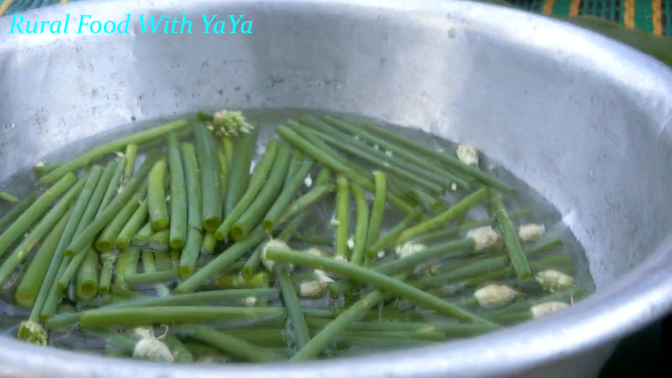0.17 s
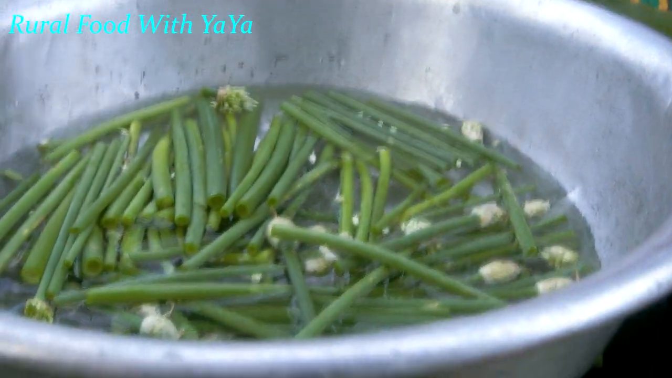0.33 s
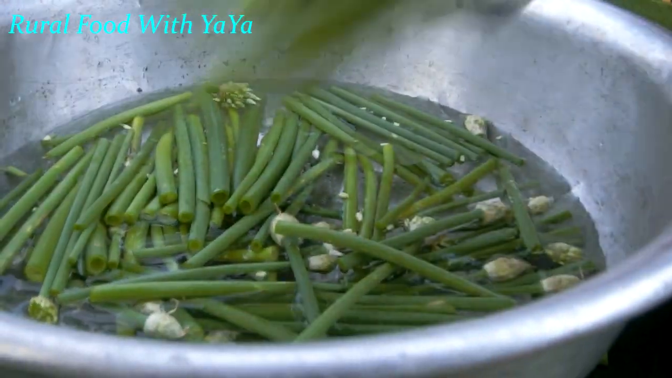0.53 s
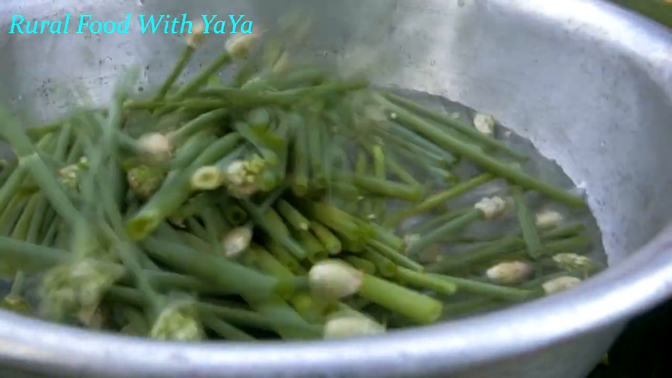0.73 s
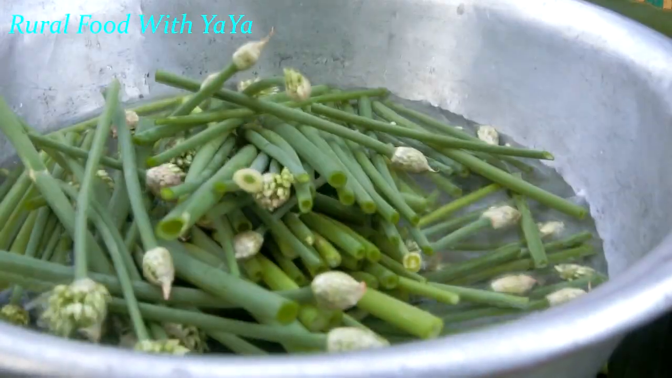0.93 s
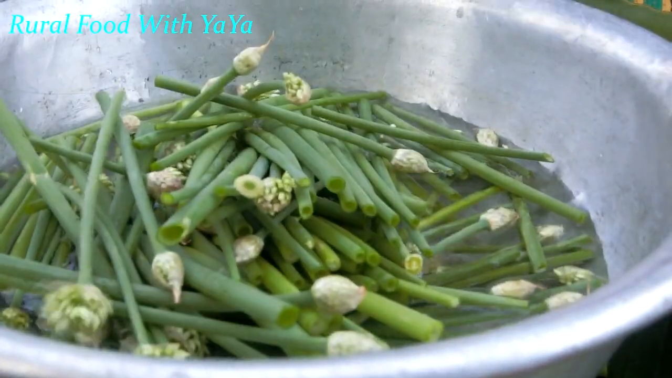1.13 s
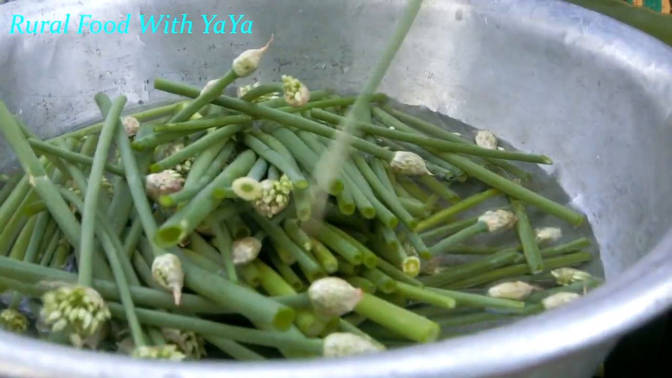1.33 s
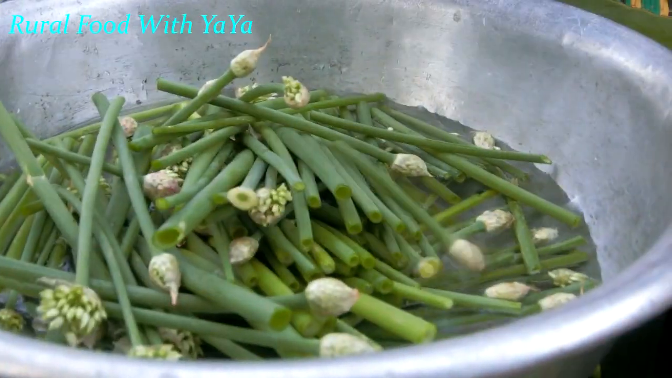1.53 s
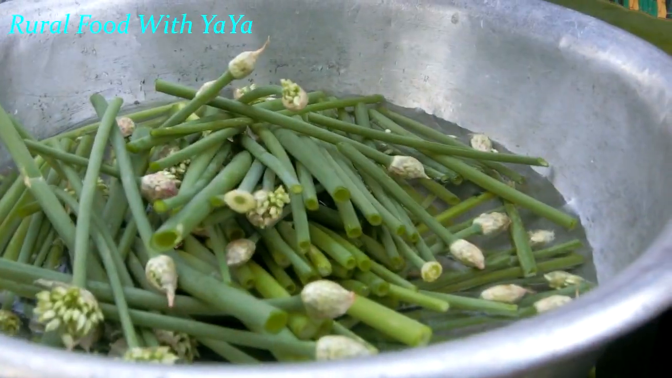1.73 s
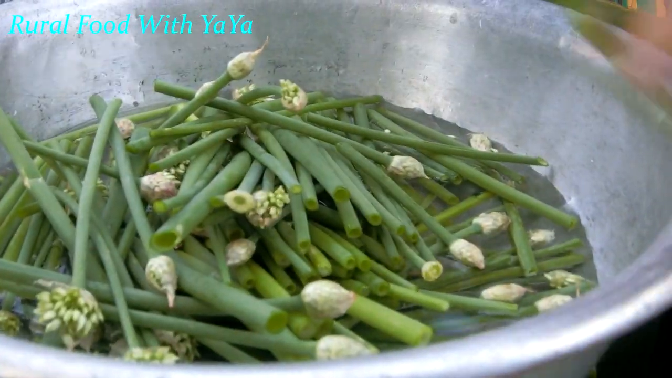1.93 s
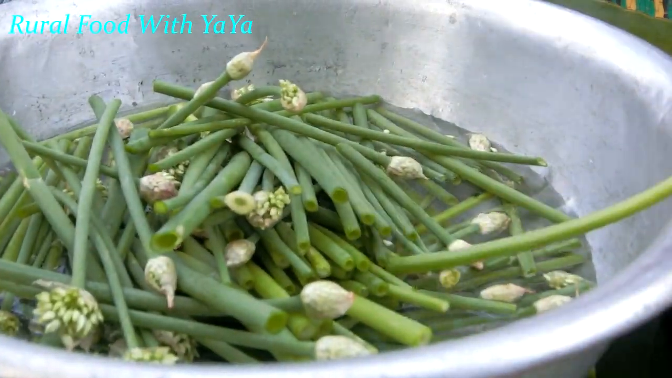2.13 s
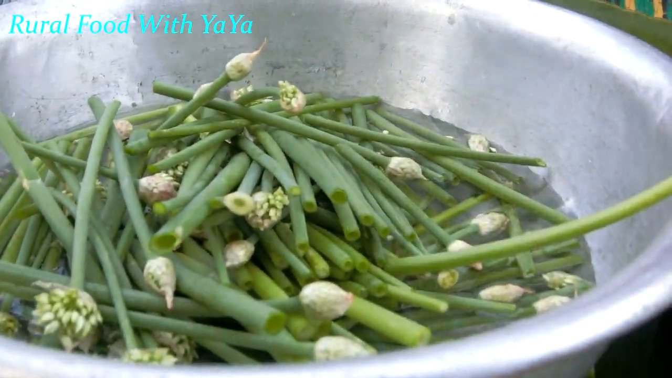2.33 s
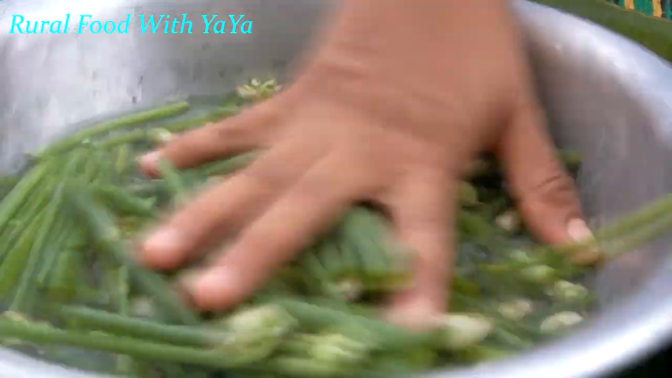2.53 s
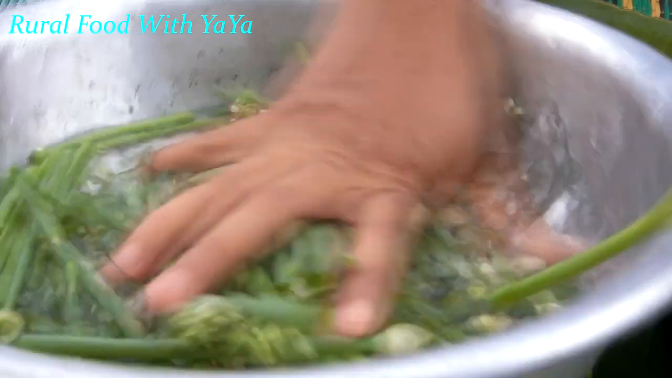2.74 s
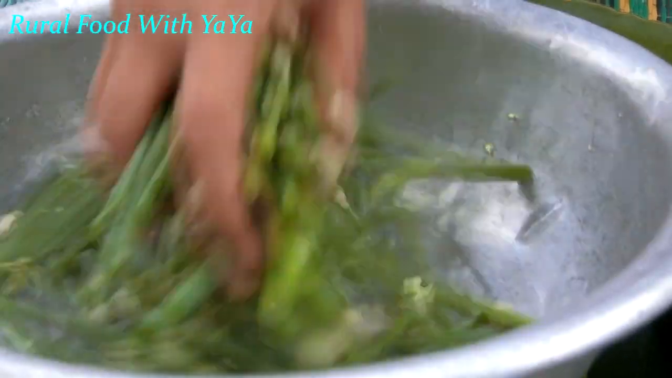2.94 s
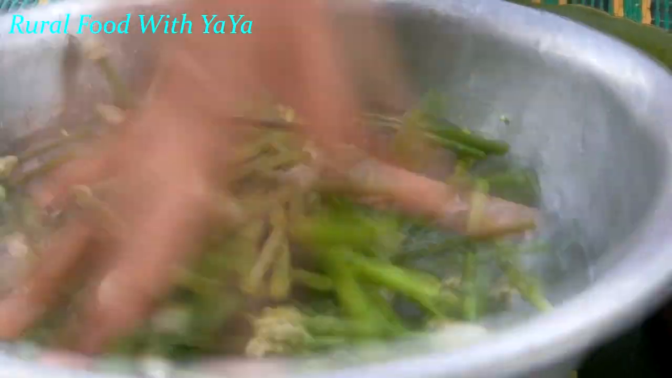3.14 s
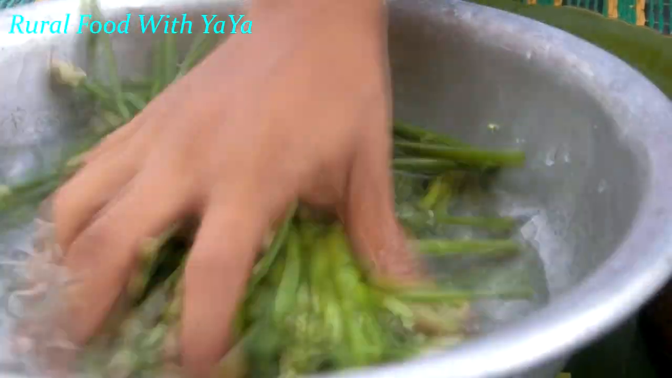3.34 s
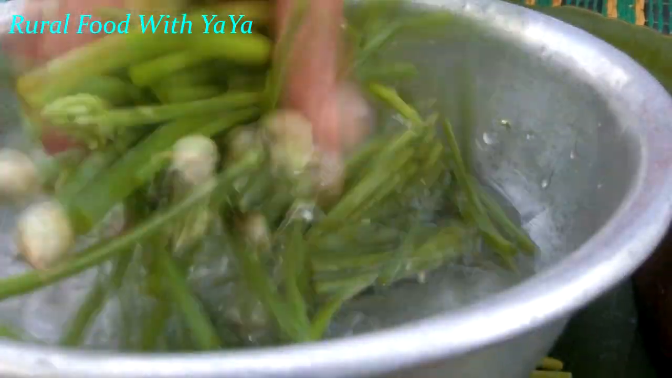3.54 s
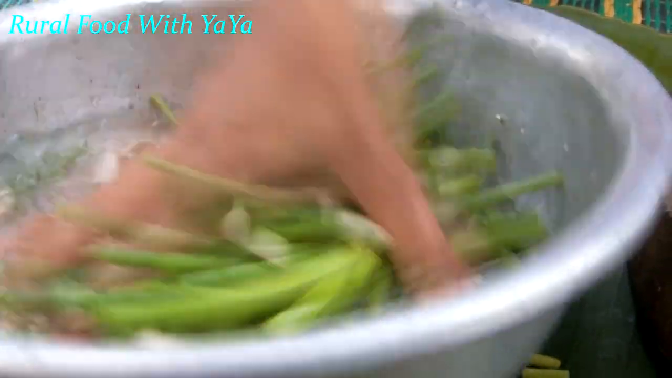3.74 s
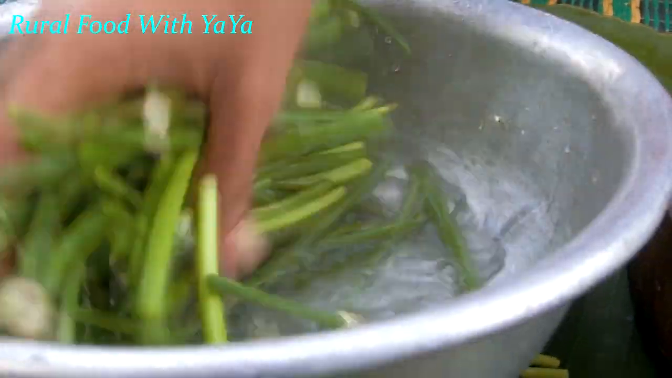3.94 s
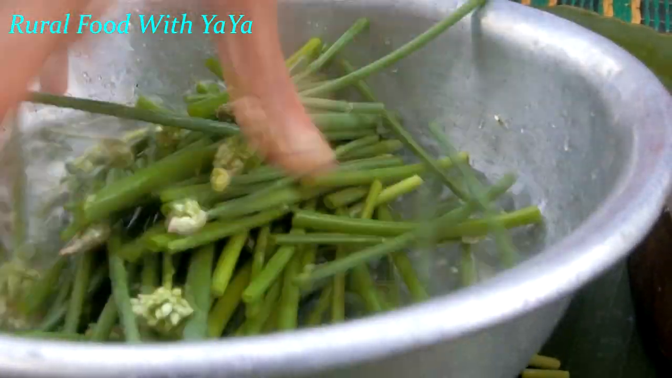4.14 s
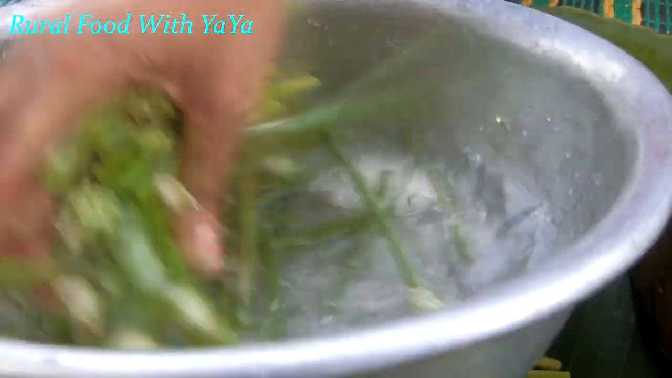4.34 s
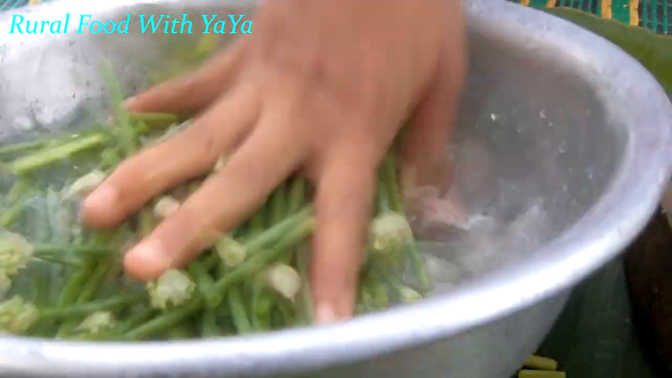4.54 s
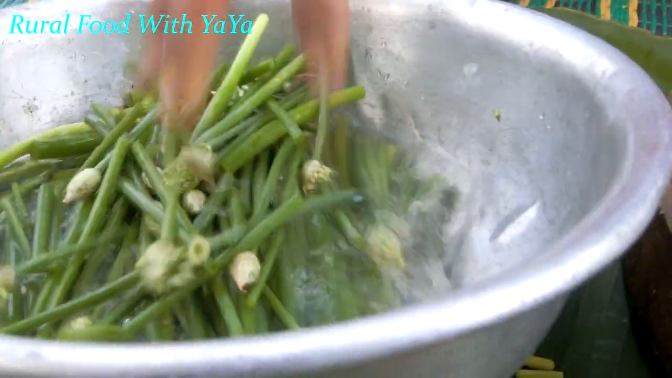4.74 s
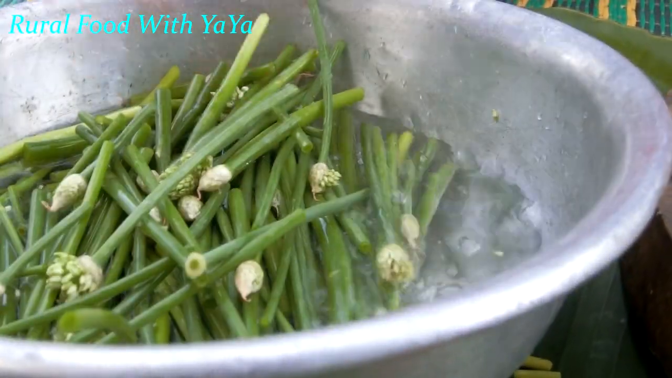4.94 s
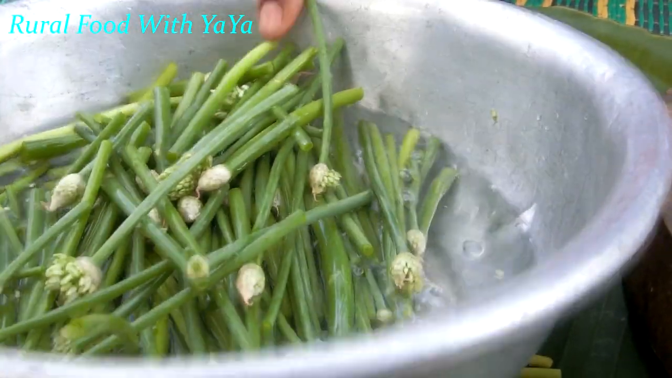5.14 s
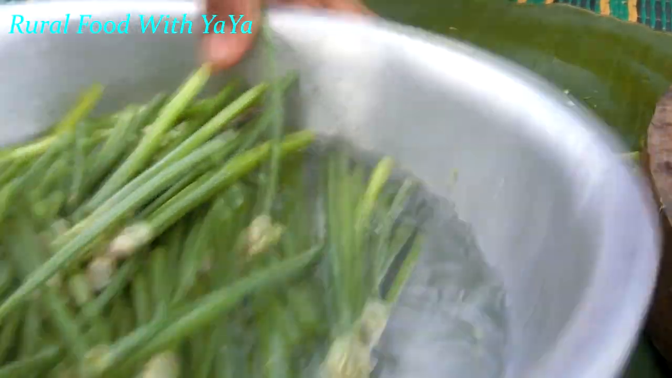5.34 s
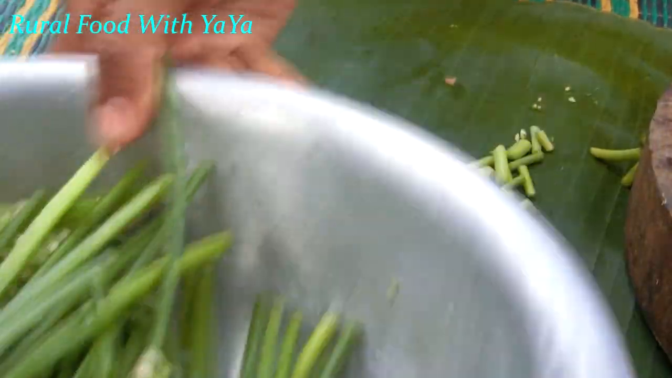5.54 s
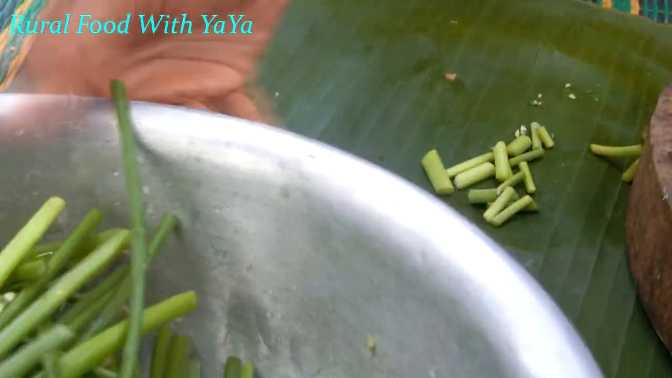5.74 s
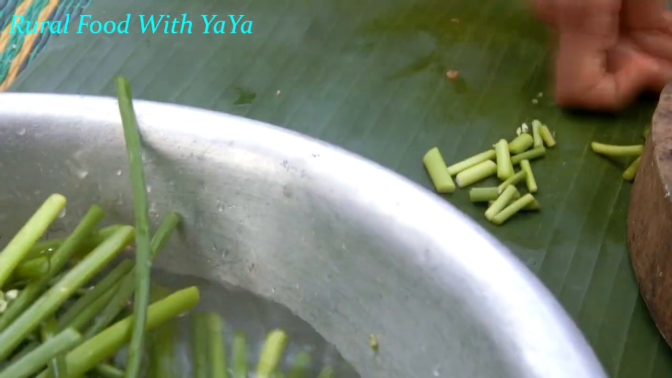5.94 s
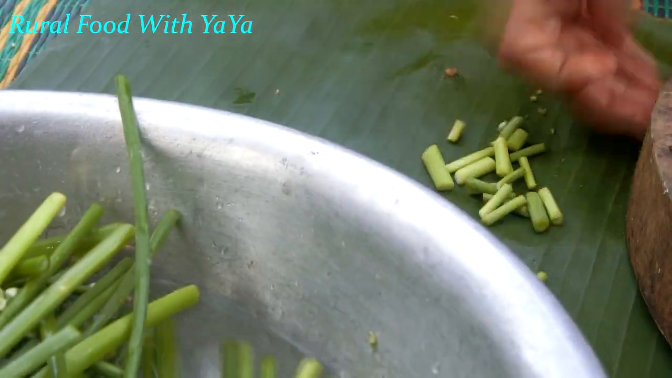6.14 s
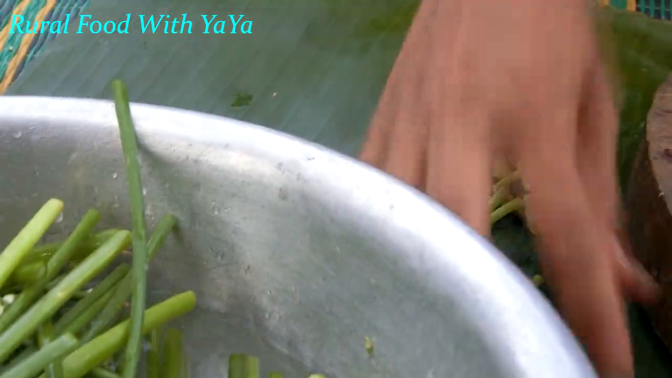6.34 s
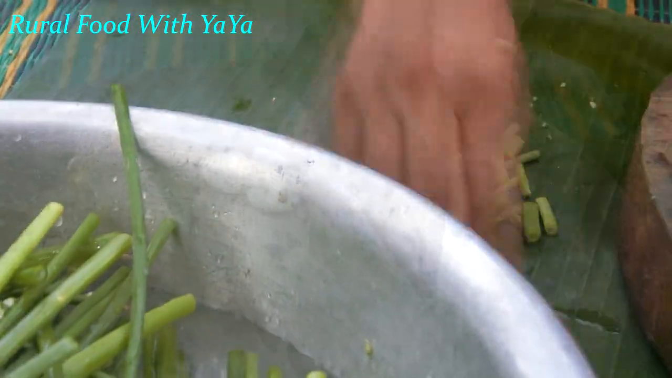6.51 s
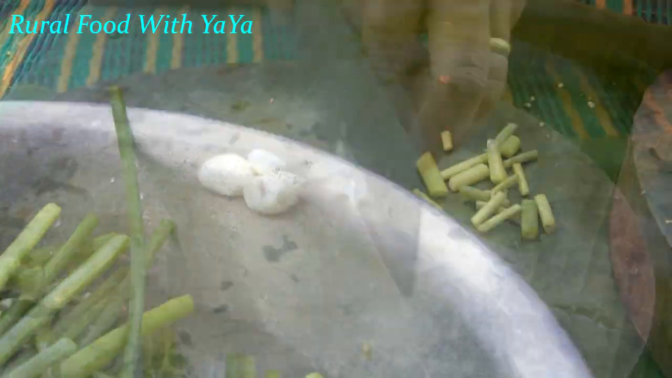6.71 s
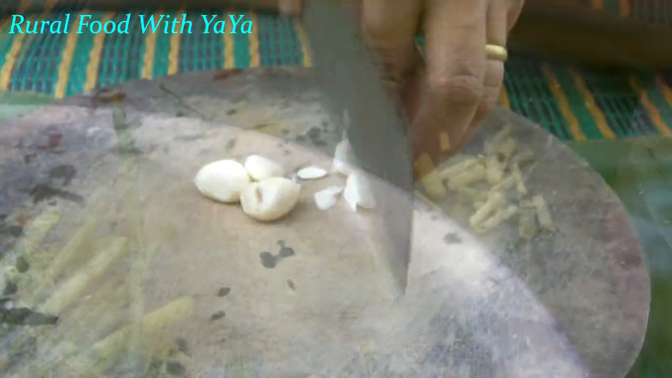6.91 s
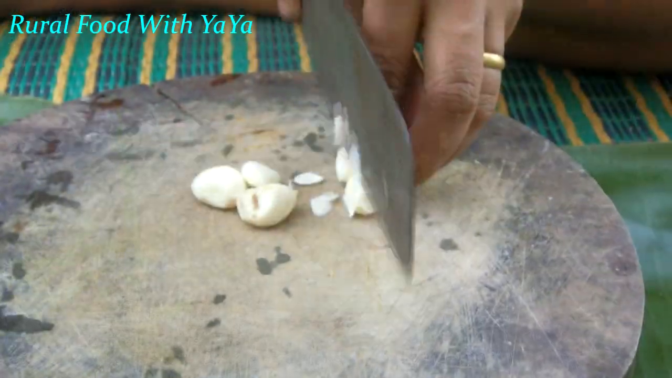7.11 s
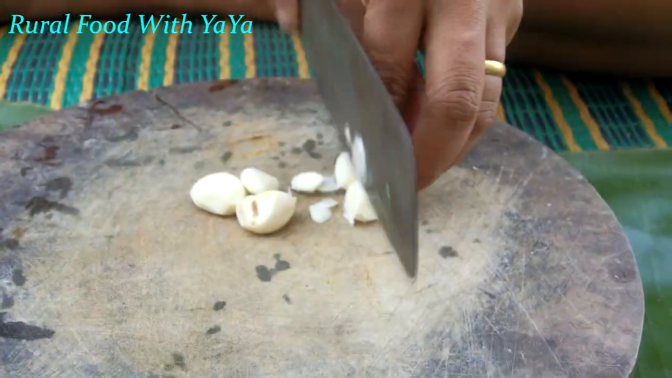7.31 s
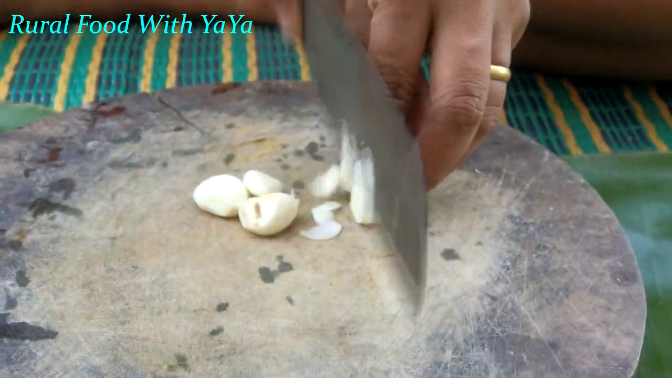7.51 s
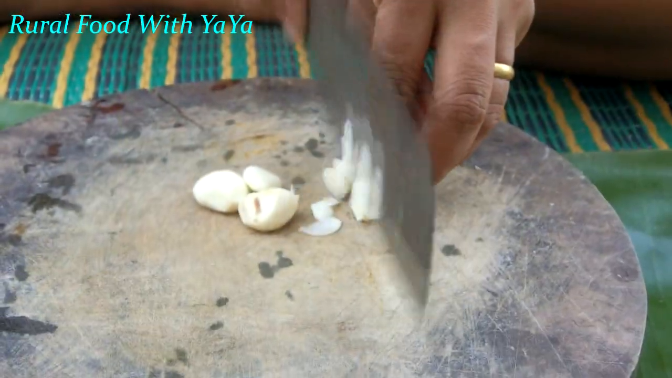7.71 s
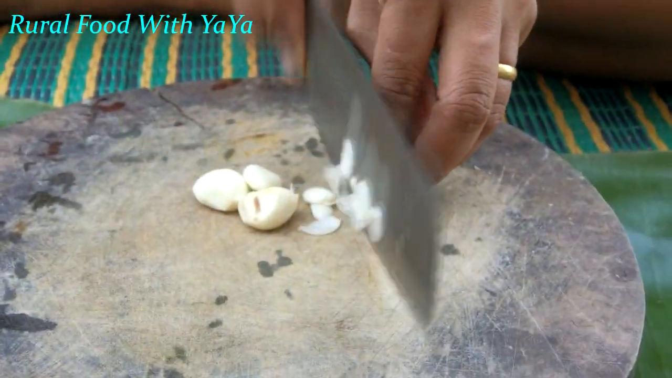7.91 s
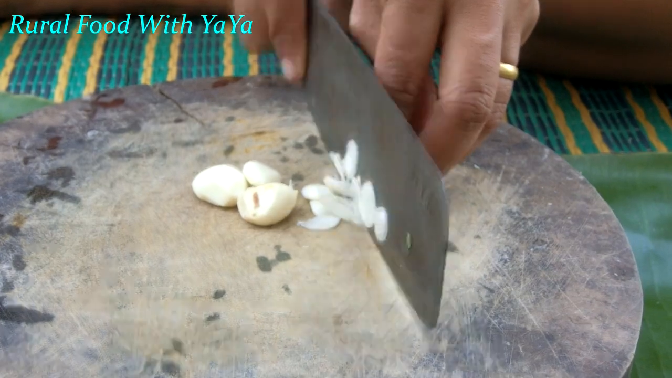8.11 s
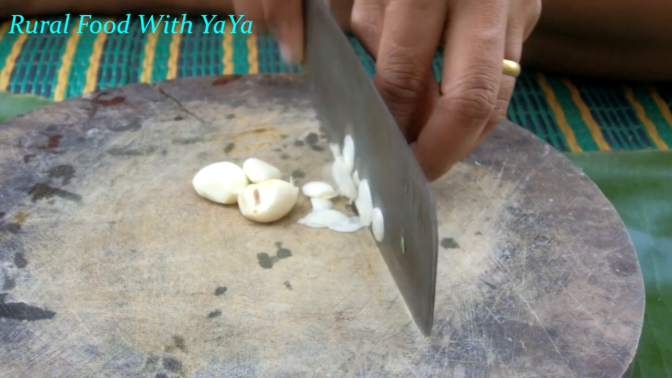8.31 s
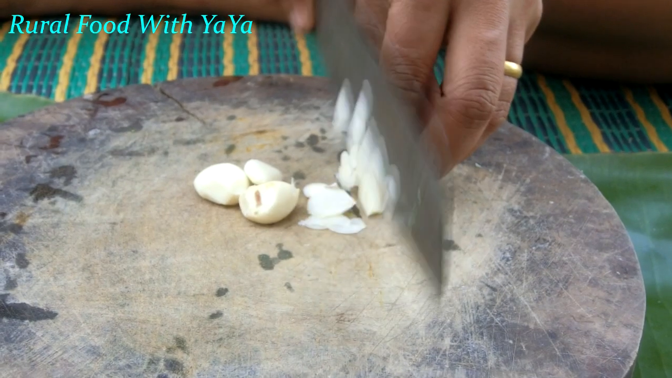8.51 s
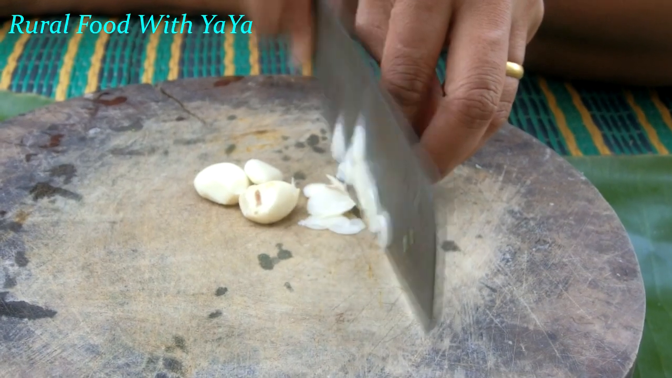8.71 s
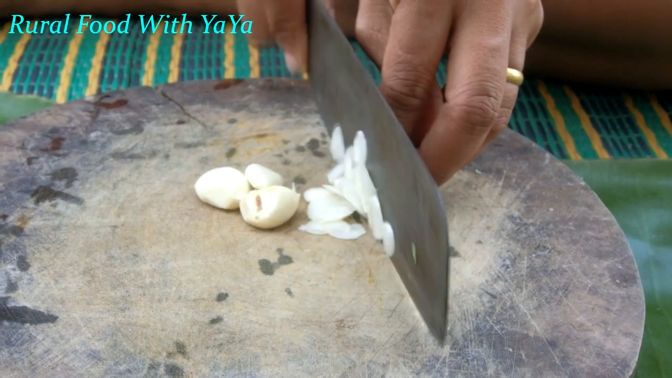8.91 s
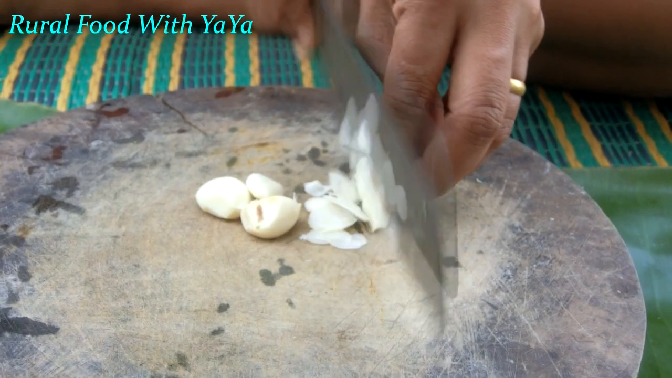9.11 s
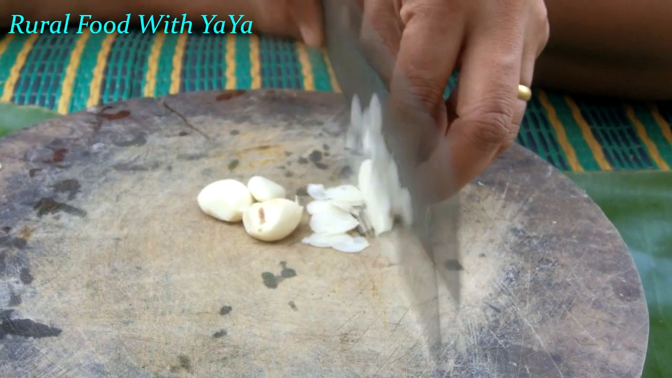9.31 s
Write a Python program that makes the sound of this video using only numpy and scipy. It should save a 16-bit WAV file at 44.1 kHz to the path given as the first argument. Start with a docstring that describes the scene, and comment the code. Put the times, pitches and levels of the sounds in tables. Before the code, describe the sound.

Quiet open air, microphones close. Watery rustling of stalks in a metal basin comes first, interrupted by one bright clatter of steel laid down with two woody knocks. Wet stirring with fine fizz and little pops continues, then a gritty basin drag and dull leaf rubbing. Finally a blade chops garlic about five times a second, each crisp crunch ending in a solid wooden knock, some doubled.

```python
"""Wet stalks and a cleaver, outdoors

Stalks drop and are washed by hand in a metal basin: crackly noise, bubbles and knocks on ringing metal.
A cleaver clatters down as noise through steel modes; the basin drags over a leaf as patchy grit noise.
Then the cleaver crunches through garlic (fine clicks) and knocks on a thick wooden board (dying modes),
some knocks sounding twice. Rubbing, open-air hiss and a faint early whistle are shaped noise."""
import sys
import numpy as np
from scipy import signal
from scipy.fft import rfft, irfft, next_fast_len
from scipy.io import wavfile
from scipy.ndimage import uniform_filter1d

SR = 44100
rng = np.random.default_rng(int(sys.argv[2]) if len(sys.argv) > 2 else 0)


def makeup_ratio(level_db):
    """Linear amplitude ratio for a level in decibels (20 dB per factor of ten)."""
    decades = np.asarray(level_db, float) / 20
    return 10 ** decades


def log_audio(samples):
    """Write samples as a 16-bit WAV file to the path given in sys.argv[1]."""
    # one column per channel
    frames = np.atleast_2d(samples).T
    # limit to full scale, then quantise
    limited = np.clip(frames, -1, 1)
    pcm = np.round(limited * 32767).astype(np.int16)
    wavfile.write(sys.argv[1], SR, pcm)


N = 412776  # length in samples

# In the spectrum tables only the shape counts: the noise is scaled to rms 1 afterwards.
# strokes on the board: t/s, peak level/dB, contact/ms, bite (gain of the high modes)/dB,
CHOPS = [(2.3659, -14, 0.35, -.5, None), (2.3752, -12.5, 0.17, 0, None), (6.514, -28.5, .61, 1, None),
         (6.7591, -18.5, 0.94, 11, None), (6.9737, -16.5, 0.96, 11, None),
         (7.0537, -14.5, 0.079, -15, -25.5), (7.1799, -14.5, 0.34, 5, -9), (7.3852, -11, 0.37, -3, -17),
         (7.5742, -13.5, 0.49, 4, None), (7.7719, -10.5, 0.49, 8, -17), (7.954, -8.5, 0.085, -4.5, -9.5),
         (8.136, -17.5, 0.66, -4, -14), (8.288, -17.5, 0.33, 6.5, -10), (8.452, -26, 0.33, 2.2, -11.5),
         (8.608, -17, 0.14, 5, -6.5), (8.7538, -8.5, 0.22, 2.7, -11), (8.9146, -17.5, 0.72, 4.5, None),
         (9.0705, -15, 0.49, 6, None), (9.2247, -10.5, 0.42, -0.5, None)]
# modes of the wooden board: f/Hz, level/dB, time to fade by 60 dB/s, before each stroke alters them
BOARD_MODES = [(488, -18.5, 0.06), (615.4, 1, 0.032), (977, -1.5, 0.028), (1018, 2, 0.033),
               (1370, -4, 0.006), (1398, 6, 0.024), (1616, 0, 0.021), (1890, 2, 0.026), (2300, 0, 0.033),
               (2417, 9.5, 0.06), (2840, -3.5, 0.016), (3400, -4, 0.017), (3970, -6, 0.026),
               (4710, 7, 0.013)]
# the edge bites a clove: t/s, drive level/dB, crunch beside the drive/dB
CUTS = [(6.739, -44, -6), (6.946, -33.5, -10.5), (7.1631, -33.5, -4), (7.361, -34.5, -8.5),
        (7.5562, -34, -12.5), (7.7485, -37.5, -8), (7.7548, -21.5, -25), (7.9367, -36.5, -6),
        (8.1076, -25, -15.5), (8.114, -44.5, -28.5), (8.277, -30.5, -13), (8.4415, -24, -15),
        (8.589, -27, -15), (8.7394, -48, 0.5), (8.745, -35, -7), (8.8966, -31.5, -11.5),
        (9.0517, -36.5, -10.5), (9.205, -34, -8.5)]
# spectrum of garlic crunch: f/Hz, level per Hz/dB
CRUNCH_SPECTRUM = [(120, -44), (200, -11), (746, -8.5), (999, -10), (3160, -12), (6220, -5.5), (8490, -8),
                   (9130, -7), (13700, -9), (15800, -23.5)]
# modes of the steel blade: f/Hz, level/dB, time to fade by 60 dB/s, before each blow alters them
BLADE_MODES = [(2450, -21.5, 0.44), (2810, -11, 0.15), (3180, -5.5, 0.067), (3745, -10.5, 0.15),
               (4380, -11, 0.06), (5346, -7, 0.038), (6400, -6, 0.13), (6866, -5.5, 0.13), (7410, -8, 0.06),
               (8210, -3, 0.015), (9100, -9.5, 0.046), (11800, -13, 0.036), (12600, 0, 0.16),
               (13700, -10.5, .04), (13890, -10, .04), (14300, -12.5, .03)]
# blows as the steel is laid down: t/s, peak level of the ring/dB, favoured f/Hz, rattle/ms, ring time factor
CLATTER = [(2.321, -27.5, 2490, 23, 0.23), (2.3318, -19.5, 8800, 6.5, 0.83), (2.342, -24, 3330, 29, 0.67),
           (2.342, -10.5, 6900, .6, 1.1), (2.345, -14, 12600, 2.2, 0.51), (2.366, -11.5, 3080, 2.8, 0.5),
           (2.375, -18.5, 4470, 3.1, 0.26), (2.382, -21.5, 2330, 6.3, 0.46), (2.408, -25, 3640, 5.3, 0.65),
           (2.406, -19.5, 11100, 5.1, 0.31), (2.412, -18, 12600, 3.7, 0.2), (2.473, -41.5, 3470, 1.5, 0.41),
           (2.499, -50, 2800, 3, 0.31), (6.877, -36.5, 6500, .6, 1.7), (7.052, -24.5, 3710, 2.2, 0.1)]
# blade pushed along the board: t/s, level/dB
SCRAPE = [(7.058, -33), (7.088, -36), (7.15, -35.5), (7.158, -41), (7.175, -63.5)]
# single drops and snaps: t/s, peak level/dB, f/Hz, left over right/dB
SNAPS = [(2.842, -50.5, 7000, 14), (2.925, -47, 6250, 5), (3.105, -48, 6540, 5), (3.162, -30, 5000, -3),
         (3.198, -46, 1150, 4), (3.216, -46.5, 1320, -6), (3.41, -49.5, 770, 5), (3.232, -34, 7330, -3),
         (3.441, -36.5, 1670, -4), (3.694, -36, 1640, -2), (3.768, -27, 6650, -5), (3.848, -46.5, 8260, 10),
         (3.873, -38.5, 5140, 1), (4.025, -47, 4830, 1.1), (4.105, -45, 1610, -5), (4.21, -41, 4800, 4),
         (4.323, -31.5, 2040, -1.5), (4.451, -43, 2180, 4), (4.48, -44.5, 1590, 2), (4.495, -38, 8700, 6),
         (4.61, -31, 6560, 9), (4.798, -40, 2160, -3), (4.956, -46.5, 4770, 5), (5.052, -45, 1560, 2),
         (5.187, -39, 5300, -5), (5.22, -45.5, 2600, -3), (6.051, -54, 1360, 2.5), (6.17, -41.5, 606, -7),
         (6.188, -43.5, 880, 1), (6.241, -42.5, 1100, -3), (6.267, -42.5, 643, -2)]
# knocks on the basin: t/s, peak level/dB, favoured f/Hz, ring time factor
BASIN_KNOCKS = [(1.414, -46.5, 780, .5), (1.667, -40.5, 950, .4), (1.706, -52, 905, 1),
                (2.009, -41.5, 1130, 1.14), (2.011, -43.5, 500, 0.74), (2.089, -52.5, 654, 1.2),
                (2.322, -28.5, 880, 0.64), (2.368, -17, 563, 0.33), (2.452, -41, 575, .8),
                (3.712, -40, 480, 0.48), (3.735, -43.5, 640, 0.9), (5.788, -51, 886, 1.5)]
# modes of the thin basin: f/Hz, level/dB, time to fade by 60 dB/s, before each knock alters them
BASIN_MODES = [(480, -5, 0.23), (567, -6, 0.15), (639, -1.5, 0.37), (762, 0, 0.13), (900, -3, 0.13),
               (980, -11, .08), (1116, -2, 0.18), (3340, -10, 0.16)]
# basin dragged aside: t/s, level/dB, treble gain/dB
DRAG = [(5.13, -67, -18), (5.188, -59.5, 5.5), (5.22, -54.5, 2.5), (5.546, -45, 1.5), (5.6, -52, 5),
        (5.63, -42, -5.5), (5.65, -53.5, 5), (5.78, -69.5, 3.5)]
# spectrum of open air: f/Hz, level per Hz/dB
AIR_SPECTRUM = [(12, -33.5), (20, 3), (44, -16.5), (674, -17), (754, -14), (1080, -20.5), (2300, -19.5),
                (4890, -23), (11300, -25.5), (14500, -22.5), (15800, -37.5)]
# spectrum of fine wet crackle and of rubbing hiss: f/Hz, level per Hz/dB
FIZZ_SPECTRUM = [(1470, -23.5), (2500, -6), (3130, -9), (3370, -8.5), (6480, -4.5), (8040, -6), (12700, -8),
                 (14800, -20.5)]
# spectrum of the low wash of water: f/Hz, level per Hz/dB
SLOSH_SPECTRUM = [(47, -50), (80, -43), (167, -8.5), (210, -15), (629, -5.5), (979, -5), (2010, -3.5),
                  (4000, -63), (5200, -14), (8800, -120)]
# spectrum of the basin sliding on the leaf: f/Hz, level per Hz/dB
GRIT_SPECTRUM = [(120, -49), (200, -23.5), (404, -20), (483, -10), (772, -3), (1420, -10.5), (2400, -10.5),
                 (3030, -5), (4050, -16.5), (4760, -13), (8170, -16.5), (11300, -17), (14800, -26)]
# left-right likeness of near sounds: f/Hz, likeness (1 = same on both sides)
NEAR_SAME = [(100, .8), (300, 0.9), (700, 1), (1400, 0.89), (2800, 0.71), (5500, 0.37), (11000, 0.092),
             (15000, .4)]
# left-right likeness of the air: f/Hz, likeness (1 = same on both sides)
AIR_SAME = [(60, 0.27), (180, 0.49), (550, 0.14), (1650, 0.52), (4970, 0.62), (15000, 0.12)]
# balance of the two microphone ports: f/Hz, left over right/dB
LEAN = [(60, 1), (180, 0), (550, -0.5), (1650, 1.5), (4970, 2), (15000, 5)]
# timing of the two microphone ports: f/Hz, phase by which the left leads/rad
LEAD = [(200, -0.52), (1000, -0.083), (2500, -0.15), (5250, 0.22), (7500, 0.81), (12000, -0.17)]
# spectrum of steel on wood grain: f/Hz, level per Hz/dB
RASP_SPECTRUM = [(180, -31), (300, -21.5), (1180, -23), (1540, -5), (3230, 0), (3510, -12), (3690, 1),
                 (4650, -12), (6460, 1), (15500, -4)]
# spectrum of dull, grainy rubbing: f/Hz, level per Hz/dB
LEAF_SPECTRUM = [(59, -52), (100, -18), (323, -14), (521, -3), (895, -4.5), (2330, -17.5), (4000, -24),
                 (5200, -52.5), (8800, -120)]
# the wet blade pulls free before the next stroke: t/s, level/dB
LIFTS = [(7.305, -57), (7.513, -62), (7.692, -61), (7.845, -63), (7.917, -54), (8.069, -69.5),
         (8.237, -59.5), (8.395, -58), (8.563, -58), (8.706, -58.5), (8.862, -75.5), (9.044, -60)]
# wet stalks dropped, water settling, a hand stirring:
# peak t/s, slosh level/dB, fizz beside it/dB, rise/s, fall/s
STIRS = [(.01, -68, 12, 0.057, 0.27), (.55, -72, 13, 0.055, 0.6), (.645, -47.5, -3.5, 0.023, .15),
         (.7, -44, 2, .1, 0.13), (.82, -68.5, -8.5, .05, 1), (1.07, -75, 12, 0.27, 0.097),
         (1.422, -63, 5.5, .022, 0.061), (1.69, -63.5, -6, 0.087, 0.18), (1.81, -66.5, -4, .1, 0.16),
         (2.012, -63.5, 11, .012, 0.023), (2.09, -60, -4, 0.049, 0.07), (2.29, -73, 9, 0.58, 0.13),
         (2.415, -39.5, -24.5, 0.13, 0.041), (2.48, -48.5, -38, 0.026, 0.053),
         (2.56, -70, 11.5, 0.017, 0.29), (2.87, -66, 10.5, 0.14, 0.21), (3.16, -51, 6.5, 0.072, 0.039),
         (3.23, -56, 4.5, 0.086, .04), (3.3, -62.5, 4.5, 0.11, 0.061), (3.44, -61.5, 9, 0.12, 0.22),
         (3.692, -48, 3.5, 0.02, 0.14), (3.76, -57.5, 8, 0.015, 0.56), (3.94, -61, 8, 0.15, 0.048),
         (4.13, -50, 1.5, 0.11, 0.1), (4.212, -51, 4, 0.0086, 0.41), (4.28, -50.5, 8.5, 0.085, 0.039),
         (4.38, -54, 9, 0.13, 0.046), (4.51, -50, 6.5, 0.087, 0.16), (4.62, -44.5, 3.5, 0.078, 0.091),
         (4.69, -61.5, 9, .05, 0.26), (5.14, -69, 1.5, 1, 0.059)]
# hand, leaf and crumbs rubbed: peak t/s, body level/dB, hiss beside it/dB, body rise/s, body fall/s
RUBS = [(5.814, -65, 5.5, 0.16, 0.06), (5.982, -60, 4.5, 0.049, 0.17), (6.086, -55, 1.3, 0.16, .3),
        (6.245, -50.5, -5.5, 0.02, 0.12), (6.505, -55.5, -3.5, 0.13, 0.73), (6.673, -54, -23, 0.19, 0.12),
        (6.735, -59, -1.5, .03, .03), (6.785, -50.5, -0.5, 0.036, 0.04), (6.83, -64.5, 6, 0.058, 0.11),
        (6.879, -62, 9.5, .04, 0.19), (6.995, -59.5, 5.5, 0.037, 0.081), (7.1, -58.5, -1, 0.43, 0.68),
        (7.8, -59.5, -13.5, 0.31, 0.7), (9.3, -73, -17, .9, .4)]
# faint distant whistle: t/s, level/dB
WHISTLE = [(.02, -73), (.19, -80), (.215, -70), (.24, -77), (.45, -85)]

REPEAT_S = .0077  # a stroke's knock is repeated after this time
REPEAT_CONTACT = 0.77  # contact time of the repeated knock, as a share of the first
# ring time factor: base, growth per ms of contact, and value for the repeated knock
RING, RING_PER_MS, REPEAT_RING = 0.64, 0.71, 0.64
CRASH_DB, CRASH_DB_PER_DOUBLING = -3.5, 2.5  # crash beside the ring at 1 ms of rattle; longer crashes more
SWING_DB = 25.5  # a burst rises and falls by this much in its rise and fall times
SEEP_DB, SEEP_FIZZ_DB = -80, -74  # water seeping between the stalks
SEEP_END_S = 6.75  # the faint water bed stops here
HISS_QUICKER = 0.52  # the hiss of a rub rises and falls in this share of its body's times
LIFT_S = .017  # length of a puff as the blade lifts
SNAP_T60_S, SNAP_LINGER = 0.048, 0.27  # puff fade at 2 kHz; it grows by this power of pitch
SNAP_SHARPNESS = 7.5  # resonance Q of a snap
WHISTLE_HZ, WHISTLE_WIDTH_HZ = 3080, 300  # width of one filter pass; two are used
BOARD_PAN_DB = 1  # the board leans left by this much more than the basin
AIR_DB = -65


def board_knocks():
    """Lists strokes and repeated knocks: (s, dB, contact ms, ring time factor, bite dB)."""
    knocks = [(s, db, ms, RING + RING_PER_MS * ms, bite_db) for s, db, ms, bite_db, _ in CHOPS]
    for s, _, ms, bite_db, repeat_db in CHOPS:
        if repeat_db:
            knocks.append((s + REPEAT_S, repeat_db, REPEAT_CONTACT * ms, REPEAT_RING, bite_db))
    return knocks


def chops():
    """A rounded push rings the board, suction first; high modes swell late; the ground returns it 2 ms later."""
    out = np.zeros(N)
    knocks = board_knocks()
    spots = rng.standard_normal((len(knocks), 2, len(BOARD_MODES), 1))
    no_bass = signal.butter(3, 380, "high", fs=SR, output="sos")  # a small board radiates no bass
    high = np.array(BOARD_MODES)[:, :1] > 2100
    t_ms = np.arange(round(.08 * SR)) * 1000 / SR
    late_db = np.where(high, -25 * np.exp(-(t_ms / 0.63) ** 2), 0)
    for (s, db, ms, stretch, bite_db), (spot, shift) in zip(knocks, spots):
        board = BOARD_MODES * (1 + [.018, 0, 0] * shift)  # the modes are detuned a little at random
        board[:, 2:] = np.where(high, np.minimum(board[:, 2:], .025), board[:, 2:])  # garlic damps high modes
        push = t_ms[:150] ** 2 * np.exp(-8 * t_ms[:150] / ms)
        body = ring(board, .08, stretch, 2.2 * spot + late_db + high * bite_db)
        knock = -signal.sosfilt(no_bass, np.convolve(body, push))
        knock *= makeup_ratio(db) / abs(knock).max()
        add(out, s, knock)
        add(out, s + 0.001802, makeup_ratio(-10) * knock)  # return from the ground
    return scattered(out, 8)


def after_knock():
    """Board, crumbs and ground rattle faintly after each knock, fading by 60 dB in 70 ms."""
    blows = np.zeros(N)
    for s, db, *_ in board_knocks():
        blows[round(s * SR)] = makeup_ratio(db)
    fade = signal.lfilter([1], [1, -makeup_ratio(-60 / (.07 * SR))], blows)
    spectrum = [(150, -19.5), (500, 6), (2000, -2.0), (5000, -6.5), (15000, -20)]  # f/Hz, level per Hz/dB
    return makeup_ratio(-25) * fade * colour(grains(N, 9000, 2.5), spectrum)


def cuts():
    """Cells burst in a tick, then crackle until the board stops the edge; the steel rings along."""
    force = np.zeros(N)
    stops = np.array(board_knocks())[:, 0]
    t = np.arange(4000) / SR
    for s, db, crunch_db in CUTS:
        length = stops[stops > s].min() - s + 0.0025
        tick = 0.32 * np.exp(-t / 0.00069)
        crunch = makeup_ratio(crunch_db) * np.exp(-np.maximum(t - length, 0) / 0.0044)
        add(force, s, makeup_ratio(db) * (tick + crunch))
    crackle = grains(N, 14000, 5.6)
    steel = evened(signal.oaconvolve(crackle, ring(BLADE_MODES, .1, 0.34)[None])[:, :N])
    return force * (colour(crackle, CRUNCH_SPECTRUM) + 0.43 * steel)


def scrape():
    """Rough wood grain drives the steel's modes, now one, now another, while the edge slides."""
    grit = grains(N, 18000, 1.5)
    modes_hz = np.array(BLADE_MODES)[:, :1]
    body = ring(BLADE_MODES, .1, 0.93, -3 * np.log2(modes_hz / 5200) ** 2)
    steel = patchy(signal.oaconvolve(grit, body[None])[:, :N], 1.8)
    return level(SCRAPE, 1) * evened(0.74 * steel + colour(grit, RASP_SPECTRUM))


def clatter():
    """Short rattling contacts crash and ring the steel, each favouring the modes near one pitch."""
    out = np.zeros((2, N))
    modes_hz = np.array(BLADE_MODES)[:, :1]
    t_ms = np.arange(3000) * 1000 / SR
    for s, db, hz, ms, stretch in CLATTER:
        rattle = rng.standard_normal((2, len(t_ms)))
        fade = np.exp(-t_ms / ms)
        body = ring(BLADE_MODES, 0.2, stretch, -60 * np.log2(modes_hz / hz) ** 2)
        tone = signal.fftconvolve(rattle * fade, body[None])
        wide = signal.iirpeak(hz, .9, SR)
        crash = rattle * (fade + 0.37 * np.exp(-t_ms / 12))
        crash = signal.lfilter(*wide, signal.lfilter(*wide, crash))
        crash_db = db + CRASH_DB + CRASH_DB_PER_DOUBLING * np.log2(ms)
        add(out, s, makeup_ratio(db) * tone / abs(tone).max())
        add(out, s, makeup_ratio(crash_db) * crash / abs(crash).max())
    return out


def handling():
    """Slosh: short bubbles of many pitches over a low wash; fizz: fine wet crackle in clumps."""
    t = np.arange(900) / SR
    bubbles = np.zeros((2, N))
    for hz in np.geomspace(600, 2600, num=12):
        blip = np.sin(2 * np.pi * hz * t * (1 + 6 * t)) * np.exp(-t * hz / 5.5)  # pitch rises
        bubbles += signal.oaconvolve(grains(N, 16, 3.5), blip[None])[:, :N]
    clumps = makeup_ratio(1.2 * evened(uniform_filter1d(rng.standard_normal(N), 500)))
    wash = colour(grains(N, 5000, 0.87), SLOSH_SPECTRUM)
    slosh = evened(clumps * (wash + 0.5 * evened(bubbles)))
    fizz = patchy(clumps * colour(grains(N, 9000, 0.85), FIZZ_SPECTRUM), 3.2)
    near = np.arange(N) / SR < SEEP_END_S
    slosh_gain = bursts(STIRS, False) + makeup_ratio(SEEP_DB) * near
    fizz_gain = bursts(STIRS, True) + makeup_ratio(SEEP_FIZZ_DB) * near
    return slosh_gain * slosh + fizz_gain * fizz


def basin():
    """Stalks and tools knock the thin metal; the modes near the struck spot's pitch ring out."""
    out = np.zeros(N)
    modes_hz = np.array(BASIN_MODES)[:, :1]
    thuds = rng.standard_normal((len(BASIN_KNOCKS), 400)) * np.exp(-np.arange(400) / 60)
    for (s, db, hz, stretch), thud in zip(BASIN_KNOCKS, thuds):
        favour_db = -np.minimum(25 * np.log2(modes_hz / hz) ** 2, 14)
        sound = np.convolve(ring(BASIN_MODES, .3, stretch, favour_db), thud)
        add(out, s, makeup_ratio(db) * sound / abs(sound).max())
    no_bass = signal.butter(5, 420, "high", fs=SR, output="sos")
    return scattered(signal.sosfilt(no_bass, out), 9.4)


def drag():
    """Grit under the sliding rim rasps; its treble gain is set separately from its level."""
    rasp = patchy(colour(grains(N, 8000, 1.0), GRIT_SPECTRUM), 1.1)
    low = signal.sosfiltfilt(signal.butter(2, 1800, fs=SR, output="sos"), rasp)
    return level(DRAG, 1) * (low + level(DRAG, 2) * (rasp - low))


def snaps():
    """Drops and snaps are each a wide tick of noise with a short ring at its own pitch."""
    out = np.zeros((2, N))
    t = np.arange(3000) / SR
    for s, db, hz, pan_db in SNAPS:
        t60 = SNAP_T60_S * (hz / 2000) ** SNAP_LINGER
        puff = rng.standard_normal((2, len(t))) * makeup_ratio(-60 * t / t60)
        tone = signal.lfilter(*signal.iirpeak(hz, SNAP_SHARPNESS, SR), puff)
        sound = evened(tone) + 0.067 * evened(puff)
        add(out, s, makeup_ratio(db) * sound / abs(sound).max() * makeup_ratio([[pan_db / 2], [-pan_db / 2]]))
    return out


def rustle():
    """Dry rubbing: a dull grainy body, a fine hiss, and short puffs as the blade lifts."""
    body = patchy(colour(grains(N, 3000, 2.4), LEAF_SPECTRUM), 1.7)
    hiss = patchy(colour(grains(N, 8300, 3.0), FIZZ_SPECTRUM), 3.1)
    puffs = np.zeros(N)
    for s, db in LIFTS:
        add(puffs, s, makeup_ratio(db) * signal.windows.tukey(round(LIFT_S * SR), .6))
    return bursts(RUBS, False) * body + (bursts(RUBS, True, HISS_QUICKER) + puffs) * hiss


def whistle():
    """A narrow wavering band of noise, far away."""
    band = signal.iirpeak(WHISTLE_HZ, WHISTLE_HZ / WHISTLE_WIDTH_HZ, SR)
    tone = signal.lfilter(*band, signal.lfilter(*band, rng.standard_normal((2, N))))
    return level(WHISTLE, 1) * evened(tone)


def open_air():
    """Steady open-air hiss: shaped noise."""
    return makeup_ratio(AIR_DB) * colour(rng.standard_normal((2, N)), AIR_SPECTRUM)


def ring(modes, seconds, stretch=1, extra_db=0):
    """Sum of dying modes after one click."""
    hz, db, t60 = np.transpose(modes)[:, :, None]
    t = np.arange(round(seconds * SR)) / SR
    fade = makeup_ratio(db + extra_db - 60 * t / (t60 * stretch))
    return (fade * np.sin(2 * np.pi * hz * t)).sum(0)


def grains(size, per_s, spread_db):
    """Two unrelated trains of tiny clicks, a few of them large."""
    big = makeup_ratio(spread_db * np.minimum(rng.exponential(1, (2, size)), 4))
    return evened(big * rng.standard_normal((2, size)) * (rng.random((2, size)) < per_s / SR))


def bursts(rows, upper, pace=1):
    """Gain of bursts that swell to a peak and die away; upper picks the second, brighter layer."""
    t = np.arange(0, N / SR + .002, .001)
    s, db, beside_db, rise, fall = np.transpose(rows)[:, :, None]
    swing_db = SWING_DB * np.maximum((s - t) / rise, (t - s) / fall) / pace
    gain = makeup_ratio(db + upper * beside_db - swing_db)
    return np.interp(np.arange(N) / SR, t, np.sqrt((gain ** 2).sum(0)))


def patchy(x, depth_db):
    """Random patches, some hundred Hz wide and some ten ms long, swell and fade."""
    z = signal.stft(x, nperseg=256)[2]
    patches = uniform_filter1d(rng.standard_normal(z.shape[1:]), size=7, axis=0)
    patches = uniform_filter1d(patches, size=9, axis=1)
    return evened(signal.istft(z * makeup_ratio(depth_db * evened(patches)), nperseg=256)[1][:, :N])


def scattered(x, ms):
    """The sound, and a copy smeared by nearby reflections that fade by 60 dB in ms."""
    t_ms = np.arange(600) * 1000 / SR
    taps = rng.standard_normal(len(t_ms)) * makeup_ratio(-60 * t_ms / ms)
    return np.array([x, 0.47 * signal.oaconvolve(x, taps / np.linalg.norm(taps))[:N]])


def ports(pair, same):
    """Two microphone ports hear a shared part and an unrelated part, with a lean and a phase lead."""
    size = next_fast_len(N)
    a, b = rfft(pair, size)
    hz = np.fft.rfftfreq(size, 1 / SR)
    likeness = np.clip(read(same, hz), 0, 1)
    turn = makeup_ratio(read(LEAN, hz) / 2) * np.exp(.5j * read(LEAD, hz))
    shared = np.sqrt((1 + likeness) / 2) * a
    apart = np.sqrt((1 - likeness) / 2) * b
    return irfft([(shared + apart) * turn, (shared - apart) / turn], size)[:, :N]


def colour(x, points):
    """Shapes the spectrum and returns rms 1."""
    size = next_fast_len(x.shape[-1])
    gain = makeup_ratio(read(points, np.fft.rfftfreq(size, 1 / SR)))
    return evened(irfft(rfft(x, size) * gain, size)[..., :x.shape[-1]])


def read(points, hz):
    """Value of a frequency table at hz, on a logarithmic pitch scale."""
    f, value = np.transpose(points)
    return np.interp(np.log(hz + 1), np.log(f + 1), value)


def level(rows, column):
    """Gain over the whole scene from a dB column; silent outside the rows."""
    rows = np.array(rows)
    return makeup_ratio(np.interp(np.arange(N) / SR, rows[:, 0], rows[:, column], -200, -200))


def evened(x):
    """Scales to rms 1."""
    return x / np.sqrt(np.mean(x ** 2) + 1e-20)


def add(mix, s, sound):
    """Adds a sound into the mix at s seconds."""
    part = mix[..., round(s * SR):][..., :sound.shape[-1]]
    part += sound[..., :part.shape[-1]]


def scene():
    """All near sources through the ports, over open air and the whistle."""
    board = chops() + after_knock() + cuts() + scrape()
    near = clatter() + handling() + snaps() + basin() + drag() + rustle()
    far = open_air() + whistle()
    board_pan = makeup_ratio([[BOARD_PAN_DB / 2], [-BOARD_PAN_DB / 2]])
    return ports(board, NEAR_SAME) * board_pan + ports(near, NEAR_SAME) + ports(far, AIR_SAME)


def low_pass(x):
    """Removes everything above the highest recorded frequency."""
    return signal.sosfilt(signal.butter(12, 16490, fs=SR, output="sos"), x)


def record(dry):
    """Gain control pulls the level down after loud blows and lets it back slowly."""
    power_db = 10 * np.log10(abs(uniform_filter1d((dry ** 2).mean(0), 200)) + 1e-12)
    fall_db = np.arange(N) * 60. / SR  # the held peak falls 60 dB a second
    held_db = np.maximum.accumulate(power_db + fall_db) - fall_db
    over_db = np.maximum(held_db + 35.0, 0)  # above -35 dB
    late_db = signal.lfilter([1 / 400], [1, 1 / 400 - 1], over_db)  # reacts over 400 samples
    mix = dry / makeup_ratio(0.37 * late_db)
    return low_pass(mix)


dry = scene()
out = record(dry)
log_audio(out)
```